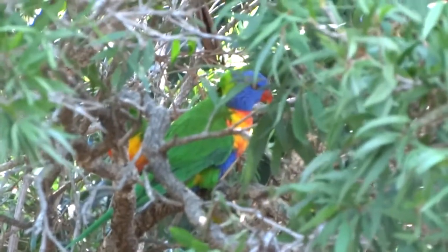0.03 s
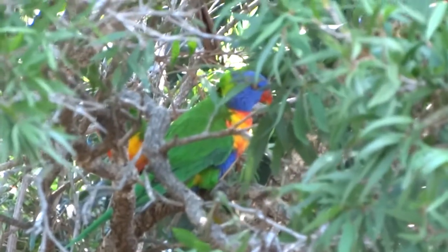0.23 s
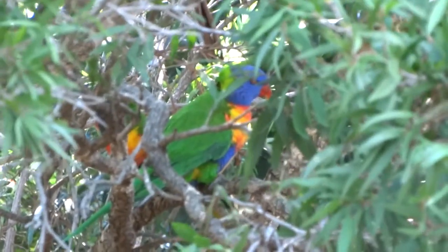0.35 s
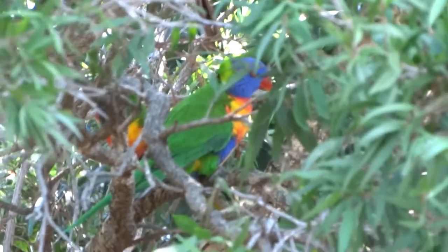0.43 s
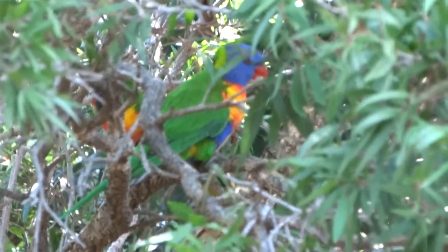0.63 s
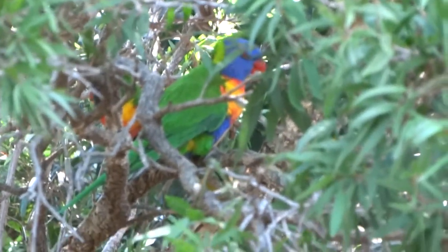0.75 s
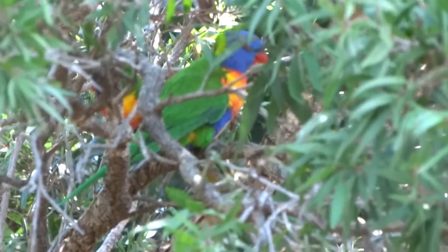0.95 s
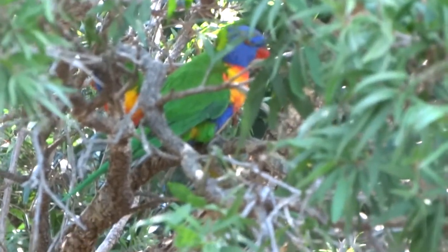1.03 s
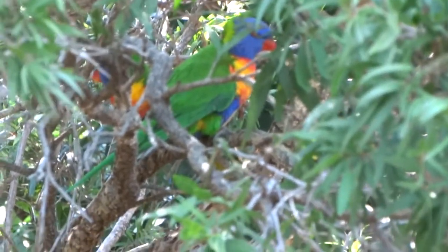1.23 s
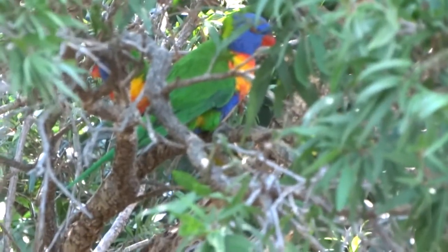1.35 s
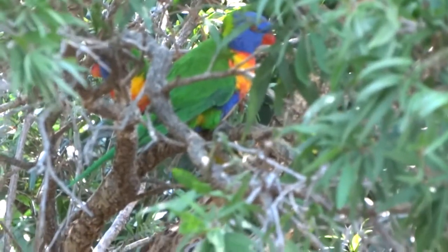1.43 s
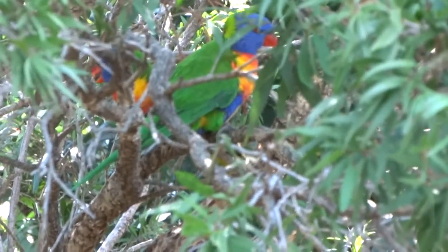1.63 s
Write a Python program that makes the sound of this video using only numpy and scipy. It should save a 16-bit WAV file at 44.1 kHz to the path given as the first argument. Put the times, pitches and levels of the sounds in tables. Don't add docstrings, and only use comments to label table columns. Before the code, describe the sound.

Close outdoor stereo pickup in leafy branches: quick bright bird chirps, then a harsh buzzing parrot squawk dropping in pitch, overlapped by another bird's raspy cry, a brief scattered tail, and very faint distant motors.

```python
import sys
import numpy as np
from scipy import signal
from scipy.fft import rfft, irfft
from scipy.io import wavfile

SR = 44100
rng = np.random.default_rng(int(sys.argv[2]) if len(sys.argv) > 2 else 0)


def master(y):
    cut = np.clip(np.atleast_2d(y).T, -1, 1)
    pcm = np.round(cut * 32767)
    wavfile.write(sys.argv[1], SR, pcm.astype(np.int16))


def to_linear_factor(level_db):
    exponent = np.asarray(level_db, float) / 20
    return 10 ** exponent


N = 74970


def rms_one(x):
    return x / np.sqrt(np.mean(x ** 2) + 1e-20)


def in_time(rows, first=0, last=N):
    time_s, *columns = np.transpose(rows)
    now_s = np.arange(first, last) / SR
    return [np.interp(now_s, time_s, column) for column in columns]


def at_hz(points, hz):
    table = np.array(points)
    return np.interp(np.log(hz), np.log(table[:, 0]), table[:, 1])


def drift(rate_hz, size):
    r = np.exp(-2 * np.pi * rate_hz / SR)
    run_in, block = 4000, 4096
    noise = rng.standard_normal((size // block + 1) * block + run_in)
    slow = signal.lfilter([1], [1, -2 * r, r * r], noise)[run_in:run_in + size]
    return slow * np.sqrt((1 - r * r) ** 3 / (1 + r * r))


def coloured(points):
    hz = np.maximum(np.fft.rfftfreq(N, 1 / SR), 20)
    spectrum = rfft(rng.standard_normal(N)) * to_linear_factor(at_hz(points, hz))
    return rms_one(irfft(spectrum, N))


def syrinx(rows, throat):
    wobble, wobble_hz = .022, 90
    flutter_hz, flutter_above = 240, .14
    break_db, break_hz = 6.5, 55
    fundamental_firm, breath_db, top_cut_hz = .6, -5.5, 13000
    first, last = int(rows[0][0] * SR), int(rows[-1][0] * SR)
    size = last - first
    hz, db, rough = in_time(rows, first, last)
    phase = 2 * np.pi * np.cumsum(hz * (1 + wobble * rough * drift(wobble_hz, size))) / SR
    tone, power = 0, 1e-9
    for k in range(1, int(top_cut_hz / hz.min()) + 1):
        gain = to_linear_factor(at_hz(throat, k * hz))
        loose = rough ** (1 / np.sqrt(k)) * (fundamental_firm if k == 1 else 1)
        flutter = drift(flutter_hz, size) + 1j * drift(flutter_hz, size)
        flutter = flutter * np.exp(1j * flutter_above * phase / k)
        breaking = to_linear_factor(break_db * rough * np.minimum(drift(break_hz, size), 1))
        shake = (np.sqrt(1 - loose ** 2) + loose * flutter / np.sqrt(2)) * breaking
        tone = tone + gain * np.real(shake * np.exp(1j * k * phase))
        power = power + gain ** 2 / 2
    above_pitch = signal.butter(4, hz.mean(), "high", fs=SR, output="sos")
    breath = signal.sosfilt(above_pitch, coloured(throat))[first:last]
    out = np.zeros(N)
    out[first:last] = to_linear_factor(db) * (tone / np.sqrt(power) + rough * to_linear_factor(breath_db) * breath)
    no_rumble = signal.butter(4, .8 * hz.min(), "high", fs=SR, output="sos")
    soft_top = signal.butter(6, top_cut_hz, fs=SR, output="sos")
    return signal.sosfilt(soft_top, signal.sosfilt(no_rumble, out + 1e-18))


def chatter(notes, throat, rough):
    attack_s, release_s, fade_db = .0025, .007, 22
    mix = 0
    for start_s, length_s, first_hz, last_hz, level_db in notes:
        end_s = start_s + length_s
        path = [(start_s - attack_s, first_hz, level_db - fade_db, rough),
                (start_s + attack_s, first_hz, level_db, rough),
                (end_s, last_hz, level_db, rough),
                (end_s + release_s, last_hz, level_db - fade_db, rough)]
        mix = mix + syrinx(path, throat)
    return mix


# time_s [s], pitch_hz [Hz], level_db [dB], roughness [0-1].
SQUAWK_PATH = [(.598, 2543, -49, 0), (.616, 2030, -41.5, 0.48), (.66, 1957, -39.5, 0.64),
               (.705, 1720, -38.5, 0.54), (.74, 1600, -39, 0.48), (.768, 1585, -42, 0.48),
               (.785, 1473, -45.5, 0.4), (.835, 1383, -45.5, 0.56), (.875, 1356, -48.5, 0.73)]
CREAK_PATH = [(.572, 838.7, -65.5, 0.42), (.586, 885.7, -39, 0.22), (.61, 902.6, -45, 0.01),
              (.645, 887, -45, 0), (.675, 888, -80, 0.59)]
BEAT_PATH = [(.6, 2632, -53, 0.8), (.612, 2450, -44, 0.34), (.645, 2247, -50, 0.76),
             (.68, 2275, -43.5, 0.74), (.70, 2023, -66, 0.2)]
HOLD_PATH = [(.772, 1519, -49, 0.19), (.785, 1489, -45, 0.04), (.83, 1467, -42.5, 0.3),
             (.868, 1430, -64, 0.38), (.878, 1400, -47, 0.42)]
TRAIL_PATH = [(.86, 1336, -63, 0.45), (.89, 1338, -55.5, 0.985), (.94, 1336, -52, 0.68),
              (1.0, 1274, -50.5, 0.857), (1.04, 1224, -63, 0.97), (1.06, 1196, -63, 0.38)]
# pitch_hz [Hz], level_db [dB]
SQUAWK_COLOUR = [(1500, 1), (2000, 2), (2700, -0.5), (3400, 0.5), (4200, 0), (5000, -3), (6600, -9),
                 (12200, -31)]
CREAK_COLOUR = [(1100, -43.5), (1800, -10), (2700, 5.5), (4500, -5.5), (6300, 6.5), (7200, -9.5),
                (8300, 5.5), (10500, -36.5)]
HOLD_COLOUR = [(1400, 1), (2900, -14), (4400, -18.5), (5900, -6), (7300, -15.5), (8800, -16), (12000, -57)]


def squawk_call():
    opening = syrinx(CREAK_PATH, CREAK_COLOUR) + syrinx(BEAT_PATH, SQUAWK_COLOUR)
    ending = syrinx(HOLD_PATH, HOLD_COLOUR) + syrinx(TRAIL_PATH, SQUAWK_COLOUR)
    return opening + syrinx(SQUAWK_PATH, SQUAWK_COLOUR) + ending


# start_s [s], length_s [s], first_pitch_hz [Hz], last_pitch_hz [Hz], level_db [dB].
HUSKY_NOTES = [(0.037, 0.0104, 2400, 1500, -56), (.060, 0.014, 2200, 1700, -56.5),
               (.088, 0.017, 1400, 4300, -64), (0.13, 0.024, 2600, 2100, -64),
               (.045, .022, 2400, 1800, -61.5)]
CHATTER_NOTES = [(.152, 0.00864, 2097, 2649, -50.5), (.163, .025, 2715, 2602, -58.5),
                 (.17, 0.0108, 2311, 2225, -53), (.209, 0.01493, 2041, 2329, -48.5),
                 (.229, 0.0044, 2195, 2538, -53), (.238, 0.0069, 2296, 2310, -58),
                 (.258, 0.0077, 2192, 2356, -59), (.274, 0.0073, 2077, 2458, -66),
                 (.298, 0.03, 2390, 2323, -60), (.318, 0.0286, 3080, 3109, -50.5),
                 (.337, 0.0224, 2370, 2514, -47), (.367, 0.01706, 2114, 2069, -49),
                 (.372, 0.0205, 3007, 3058, -52.5), (.399, 0.0158, 2116, 2521, -49.5),
                 (.415, 0.028, 2733, 2430, -63)]
YELP_NOTES = [(.220, 0.0129, 2932, 3004, -56), (.238, 0.0064, 3101, 3024, -57),
              (.282, 0.006, 2854, 2855, -54.5), (.294, 0.02, 2982, 2720, -59), (.43, .01, 3053, 3110, -65)]
# pitch_hz [Hz], level_db [dB]
HUSKY_COLOUR = [(2200, 0), (3000, 2), (3700, -17.5), (4700, -6), (5800, -6), (6800, -3), (8500, -15.5),
                (12000, -44.5)]
CHATTER_COLOUR = [(2200, -2), (3100, -7), (3750, 4.5), (4500, 1), (6300, -5), (7300, -10), (9300, -23.5),
                  (11000, -42)]
YELP_COLOUR = [(1800, -3), (2500, 7.5), (3200, 6.5), (4700, -15.5), (6000, -18), (7100, -11), (9500, -22.5),
               (13000, -71)]


def mate_before():
    husky = chatter(HUSKY_NOTES, HUSKY_COLOUR, rough=.8)
    bright = chatter(CHATTER_NOTES, CHATTER_COLOUR, rough=.62)
    return husky + bright + chatter(YELP_NOTES, YELP_COLOUR, rough=.62)


# time_s [s], pitch_hz [Hz], level_db [dB], roughness [0-1].
RASP_PATH = [(.70, 2446, -51, 0.55), (.72, 2400, -44, 0.434), (.745, 2305, -64.5, 1),
             (.80, 2431, -54, 0.965), (.83, 3149, -46, 0.868), (.88, 2777, -48, 1),
             (.915, 2307, -45.5, 0.62), (.945, 2290, -56, 0.85)]
UNDER_PATH = [(.79, 2462, -67, .7), (.81, 2300, -50.5, 0.67), (.845, 1950, -49, 0.71),
              (.875, 1900, -54, 0.61), (.91, 2134, -52.5, 1), (.93, 2180, -62, 0.77)]
CRY_PATH = [(.948, 2659, -57.5, 0.3), (.955, 2649, -51, .5), (.975, 2560, -45.5, 0.24),
            (.988, 2426, -42, .35), (1.01, 2360, -55, 0.63), (1.04, 2314, -63, 0.54),
            (1.08, 2263, -64, 0.7)]
# start_s [s], length_s [s], first_pitch_hz [Hz], last_pitch_hz [Hz], level_db [dB]
BURST_NOTES = [(.953, 0.0232, 3115, 3111, -48.5), (.97, 0.023, 2973, 2873, -45.5),
               (1.0, 0.032, 3538, 3294, -57), (1.018, 0.023, 2265, 2203, -51.5),
               (1.05, 0.0259, 2900, 2723, -64.5)]
# pitch_hz [Hz], level_db [dB]
CRY_COLOUR = [(1800, -8.5), (2500, 2.5), (3200, 18.5), (4800, -9), (6000, -18), (7200, -2.5), (9600, -18.5),
              (12000, -72.5)]


def mate_joins_in():
    rasp = syrinx(RASP_PATH, YELP_COLOUR) + syrinx(UNDER_PATH, YELP_COLOUR)
    burst = chatter(BURST_NOTES, YELP_COLOUR, rough=.8)
    return rasp + burst + syrinx(CRY_PATH, CRY_COLOUR)


def leaves(x):
    t60_s, level_db, cut_hz, alike = 0.449, -6, 13100, 0.967
    size = SR // 2
    dying = to_linear_factor(-60 * np.arange(size) / SR / t60_s)
    mid, side = rng.standard_normal((2, size)) * dying
    mid, side = np.sqrt(1 + alike) * mid, np.sqrt(1 - alike) * side
    tail = np.array([mid + side, mid - side])
    tail = signal.lfilter(*signal.butter(1, cut_hz, fs=SR), tail)
    tail = tail / np.sqrt(np.sum(tail ** 2) / 2)
    return to_linear_factor(level_db) * signal.fftconvolve(x[None], tail, axes=1)[:, :N]


# pitch_hz [Hz], level_db [dB]
EXHAUST_COLOUR = [(150, -31), (400, -24), (700, -9.5), (1000, -6), (1350, -3), (1900, -9), (2400, -14.5),
                  (3200, -23.5)]


def engine(rows, swells):
    whine_order, whine_beat_db, whine_beat_hz = 10, 2.5, 25
    fading_db, fading_hz, hiss_db = 2.5, 5, -3
    hz, db, whine_db = in_time(rows)
    phase, t = 2 * np.pi * np.cumsum(hz) / SR, np.arange(N) / SR
    tone = 0
    for k in range(1, 19):
        level_db = at_hz(EXHAUST_COLOUR, k * hz)
        for order, start_s, end_s, gain_db in swells:
            if order == k:
                level_db = level_db + gain_db * np.clip(np.minimum(t - start_s, end_s - t) / 0.0133, 0, 1)
        if k == whine_order:
            level_db = level_db + whine_db + whine_beat_db * drift(whine_beat_hz, N)
        else:
            level_db = level_db + fading_db * drift(fading_hz, N)
        tone = tone + to_linear_factor(level_db) * np.sin(k * phase + rng.uniform(0, 5.373))
    hiss = signal.lfilter(*signal.butter(2, 3500, fs=SR), coloured(EXHAUST_COLOUR))
    return to_linear_factor(db) * (tone / 1.96 + to_linear_factor(hiss_db) * hiss)


# time_s [s], firing_hz [Hz], level_db [dB], whine_db [dB]
ENGINE_PATH = [(0, 148.9, -73, -4.5), (.5, 150.8, -72, -15.5), (.8, 166.4, -64.5, -8.5),
               (1.05, 165.2, -59.5, -0.5), (1.2, 160.5, -65.5, 14.5), (1.23, 159.8, -66.5, 15),
               (1.36, 159.1, -67.5, 21.5), (1.385, 162.1, -64, 10.5), (1.46, 162.4, -63.5, 0.5),
               (1.48, 164.2, -64.5, 12), (1.65, 162, -67, 15.5), (1.7, 162, -63.5, -3.5)]
OTHER_ENGINE_PATH = [(0, 172.7, -81, 6), (1.2, 173.4, -65, -11), (1.45, 175.7, -66.5, -7),
                     (1.7, 178.9, -72.5, -5.5)]
# order [number], start_s [s], end_s [s], gain_db [dB]
WIND_SWELLS = [(16, 1.14, 1.36, 18), (14, 1.32, 1.7, 12), (6, 1.4, 1.7, 8), (7, 1.4, 1.7, 4),
               (7, .05, .45, 6), (5, .75, 1.0, 5), (4, .15, .35, 10)]


def far_engines():
    return engine(ENGINE_PATH, WIND_SWELLS) + engine(OTHER_ENGINE_PATH, [])


# pitch_hz [Hz], level_db [dB]
AIR_COLOUR = [(40, -47), (300, -20), (900, -13), (1600, -7), (3000, -9), (8000, -9), (10500, -22.5),
              (15500, -35.5)]
# pitch_hz [Hz], likeness [0-1]
AIR_LIKENESS = [(60, 0.41), (240, 1), (950, 0.457), (3770, 0.854), (7000, 1), (11000, 0.86), (15000, 0.64)]


def air():
    level_db = -63
    hz = np.maximum(np.fft.rfftfreq(N, 1 / SR), 20)
    alike = at_hz(AIR_LIKENESS, hz)
    mid = rfft(coloured(AIR_COLOUR)) * np.sqrt(1 + alike)
    side = rfft(coloured(AIR_COLOUR)) * np.sqrt(1 - alike)
    return to_linear_factor(level_db) * rms_one(irfft(np.array([mid + side, mid - side]), N))


def scene():
    left_pan, right_pan = to_linear_factor([[1], [-1]]), to_linear_factor([[-.855], [.855]])
    low_lean_db, low_lean_hz = -19, 1680
    squawk = squawk_call()
    mate = mate_before() + mate_joins_in()
    low = signal.lfilter(*signal.butter(1, low_lean_hz, fs=SR), squawk)
    lean = np.array([[1], [-1]]) * to_linear_factor(low_lean_db) * low
    birds = squawk * left_pan + lean + mate * right_pan + leaves(squawk + mate)
    return birds + far_engines() * right_pan + air()


def top_cut(x):
    return signal.sosfilt(signal.butter(12, 15610, fs=SR, output="sos"), x)


def record(dry):
    return top_cut(dry)


dry = scene()
out = record(dry)
master(out)
```